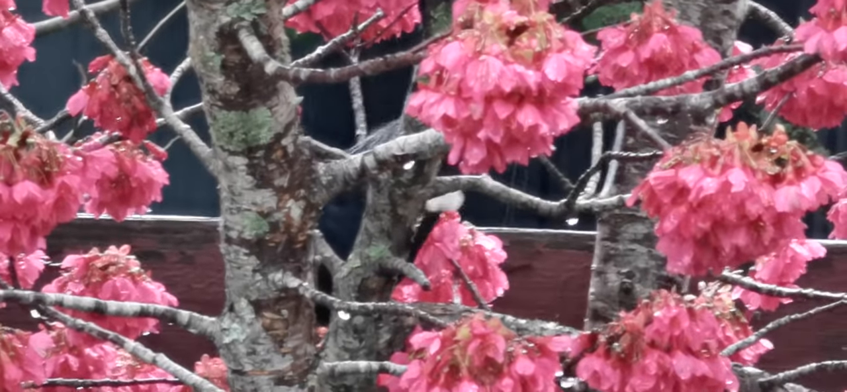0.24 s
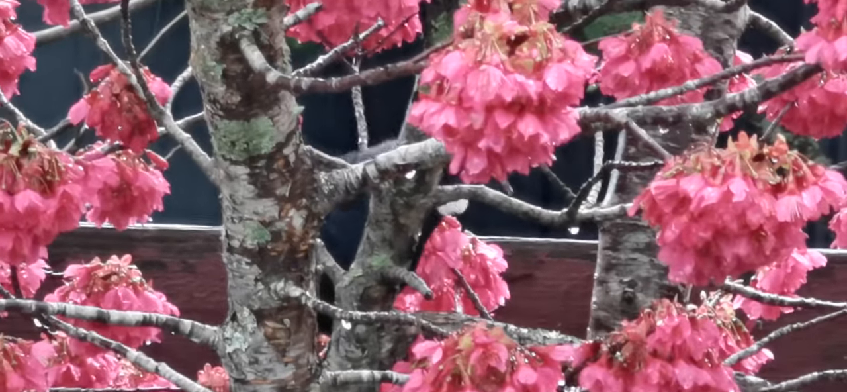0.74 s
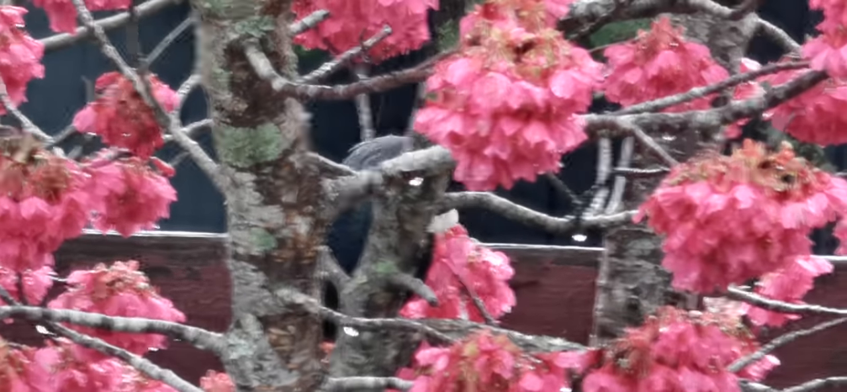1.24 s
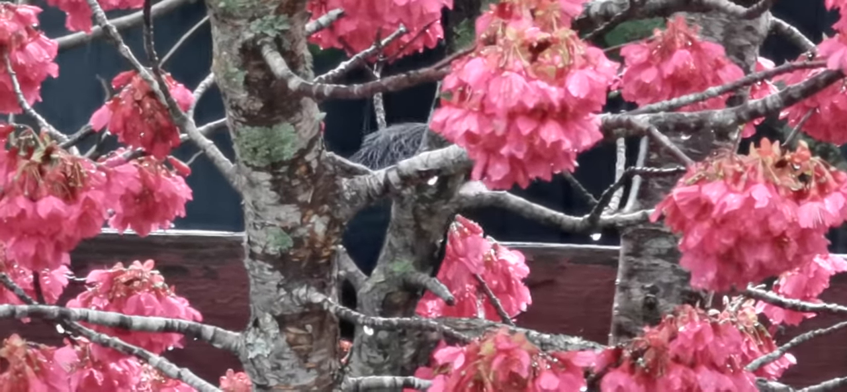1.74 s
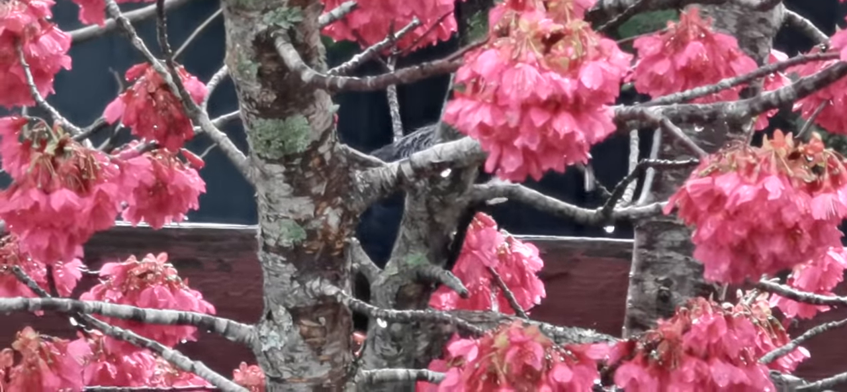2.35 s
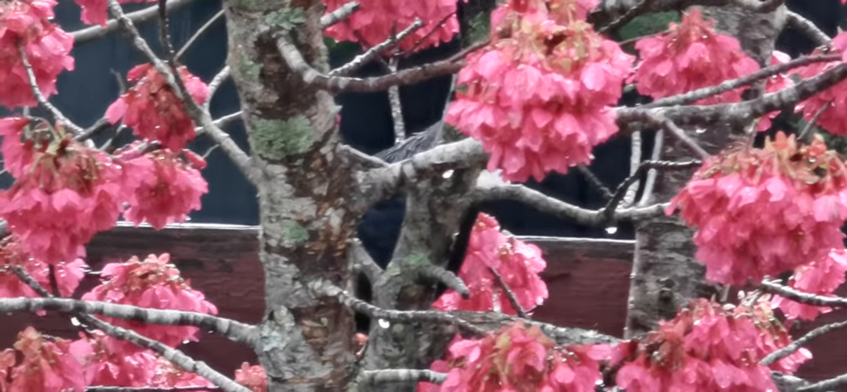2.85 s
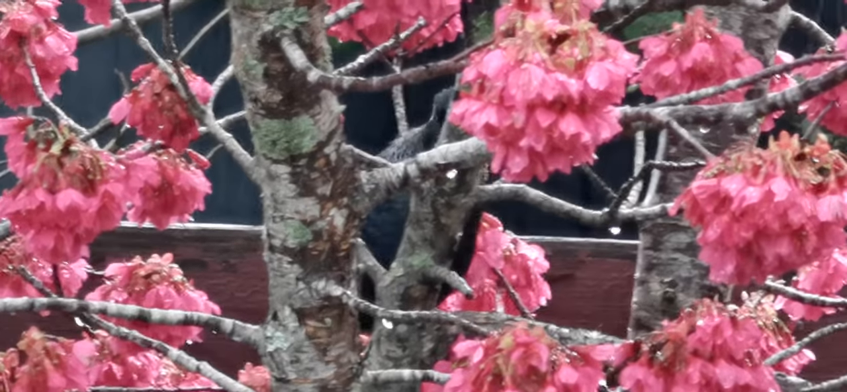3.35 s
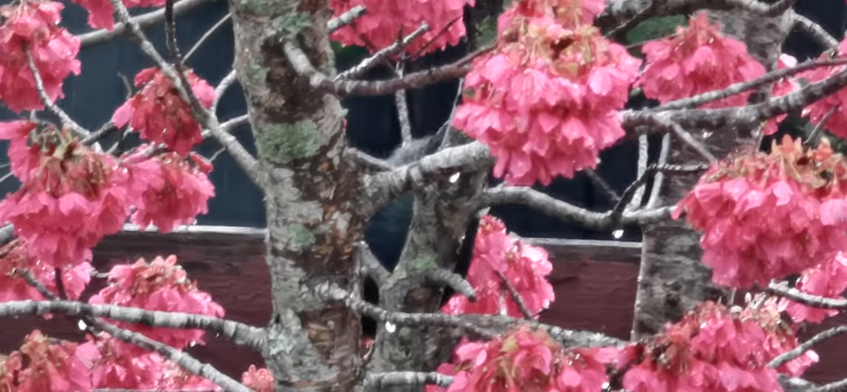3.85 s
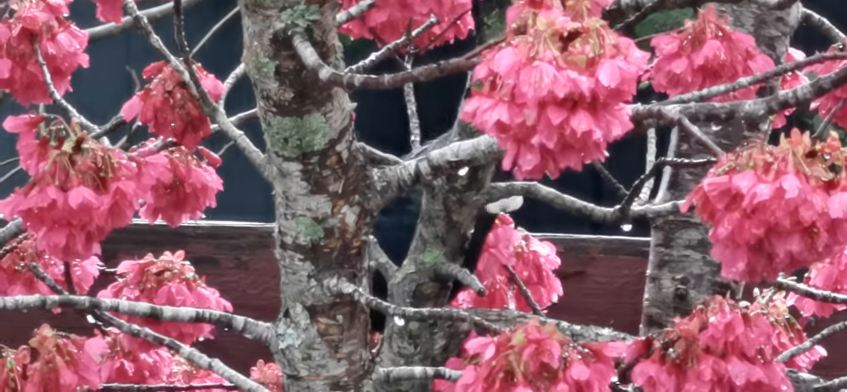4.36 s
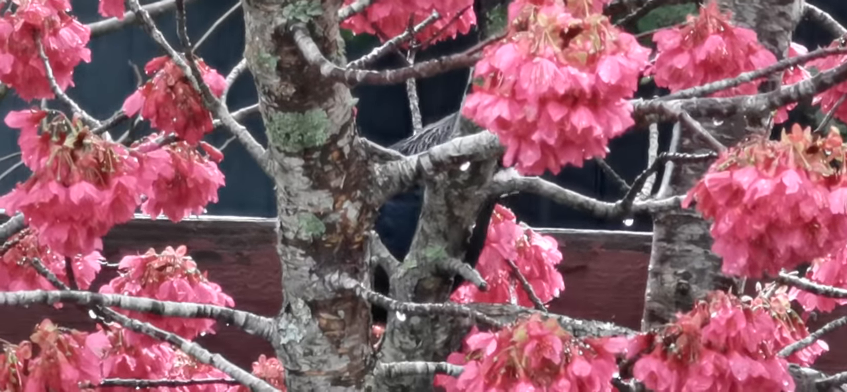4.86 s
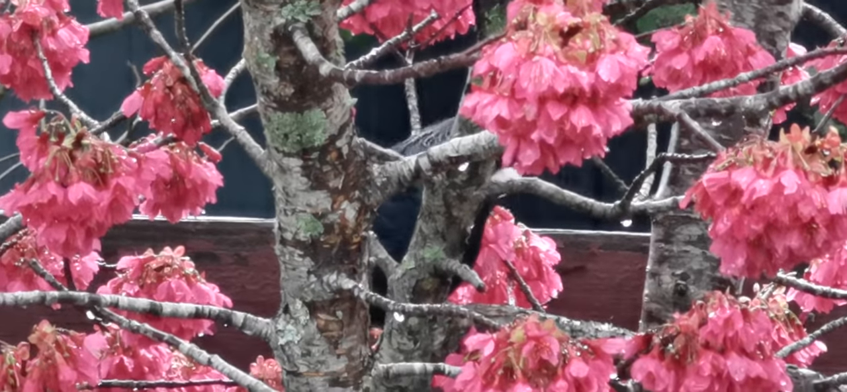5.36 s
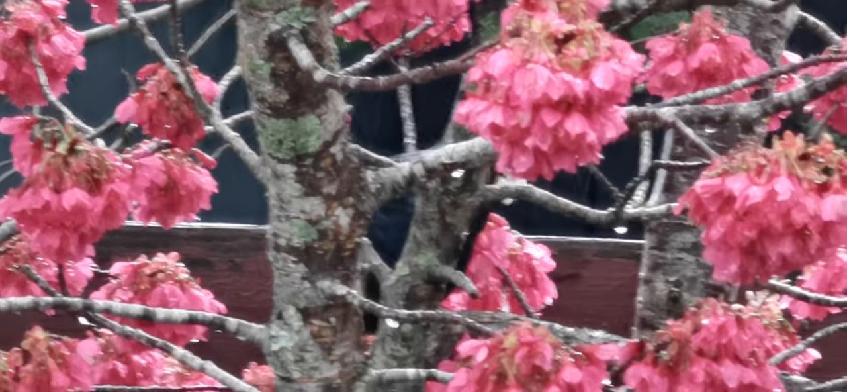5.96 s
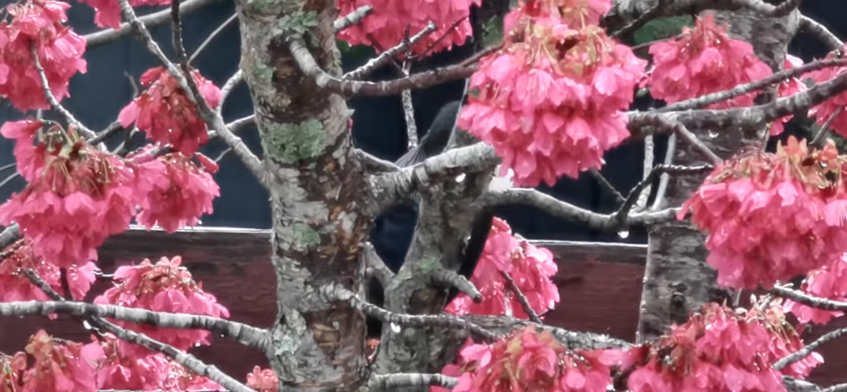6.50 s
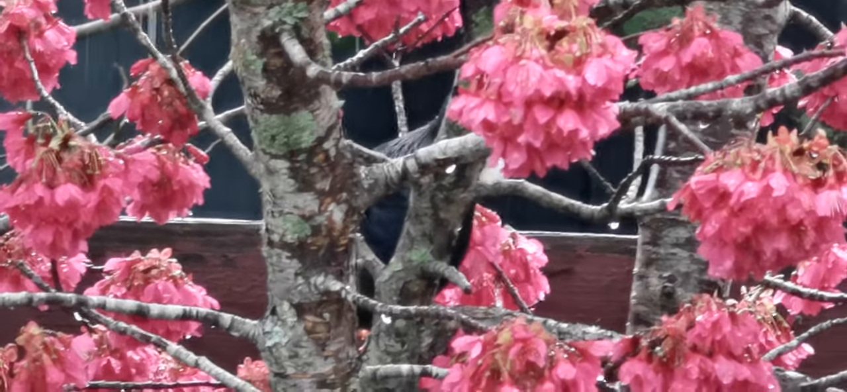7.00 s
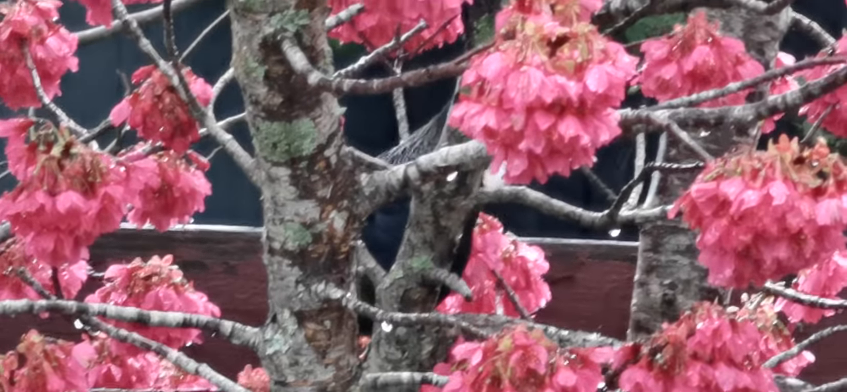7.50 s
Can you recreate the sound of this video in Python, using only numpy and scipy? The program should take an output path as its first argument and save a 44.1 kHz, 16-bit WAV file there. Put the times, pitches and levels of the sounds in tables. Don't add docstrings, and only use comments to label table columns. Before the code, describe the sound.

Outdoors by a blossom tree near a house wall, a faint low bed of distant traffic, air and machine hum runs throughout. At 0.1-0.6 s thin high whistles appear, one sharp peep at 0.27. A tiny fast trill of rising chirps comes at 0.8, then buzzy squeaks and short rasps around 1.1-1.3 and a high buzz with a wheeze at 1.8. Sliding whistles cluster at 2.1-2.5, a click at 2.6, bright buzz at 2.7, mellow notes at 3. A short harsh cough bursts at 3.6, low flute notes at 3.9-4.2, a slower high trill at 4.4, and a longer, rougher cough at 4.7-4.9. At 5.1-5.3 a loud croak rattles in about a dozen quick hollow pulses. Peeps at 5.45, a long wheeze with falling peeps from 5.7, then varied whistles, buzzes and puffs continue to 7.7. Close stereo, short leafy echoes.

```python
import sys
import numpy as np
from scipy import signal
from scipy.fft import rfft, irfft, next_fast_len
from scipy.io import wavfile
from scipy.ndimage import uniform_filter1d, minimum_filter1d, map_coordinates

SR = 44100
rng = np.random.default_rng(int(sys.argv[2]) if len(sys.argv) > 2 else 0)


def inscribe(sig):
    pcm = np.round(np.clip(np.atleast_2d(sig).T, -1, 1) * 32767)
    wavfile.write(sys.argv[1], SR, pcm.astype(np.int16))


def undo_db(level):
    steps = np.asarray(level, float) / 20
    return 10 ** steps


N = 341334

# (frequency [Hz], level [dB per Hz])
AIR_COLOUR = [(12, -27), (20, -4.5), (145, -2), (494, -17), (816, -12), (1170, -23), (1940, -18),
              (2940, -22), (4860, -19.5), (5740, -26.5), (6790, -25), (15700, -41)]
# (frequency [Hz], correlation [0-1])
AIR_LIKENESS = [(200, 0.92), (400, 0.78), (1000, 0.037), (3000, 0.029)]
# (frequency [Hz], level [dB])
MACHINE_HUM = [(40, -65), (80, -73.5), (119, -62.5), (159, -62.5), (200, -66.5)]

FAR_LEFT_DB, LEFT_DB, AHEAD_DB, RIGHT_DB, FAR_RIGHT_DB = 11, 2.5, -1, -6, -11.5
FLUTE_UNDER_HZ = 2400

# (time [s], length [s], pitch [Hz], level [dB])
HELD_LEFT = [
    (.01, 0.17, 6890, -59.5),
    (4.02, 0.072, 6830, -62),
    (4.165, 0.1, 534.5, -60),
    (5.62, 0.038, 4010, -57.5),
    (5.625, 0.019, 1332, -48),
    (7.48, 0.22, 1074, -58),
    (7.66, 0.066, 3400, -59.5),
    (.545, 0.039, 5670, -51),
]
HELD_AHEAD = [(.12, 0.15, 2294, -59), (.272, 0.036, 6366, -34), (.305, 0.067, 4926, -43.5),
              (1.36, 0.091, 4200, -47.5), (3.56, 0.063, 1913, -62), (4.08, 0.05, 527, -58.5),
              (5.455, 0.051, 6460, -37), (6.77, 0.038, 7990, -50.5), (6.96, 0.089, 4256, -55),
              (7.065, 0.033, 5200, -66), (7.3, 0.18, 1093, -57)]
HELD_RIGHT = [
    (4.1, 0.14, 1077, -44.5),
    (6.44, 0.068, 6710, -57),
    (7.25, 0.051, 10070, -52),
]
# (time [s], length [s], from [Hz], to [Hz], level [dB])
SLID_FAR_LEFT = [
    (3.483, .09, 5083, 3143, -53.5),
    (4.255, 0.043, 5420, 4510, -52.5),
]
SLID_LEFT = [(7.684, 0.03, 2164, 1560, -37.5), (.14, .03, 8590, 9000, -47),
             (3.075, 0.048, 1800, 2000, -53.5), (3.058, 0.014, 2470, 2333, -54),
             (0.96, 0.033, 2920, 2670, -65), (4.886, 0.03, 1450, 1000, -31),
             (5.455, 0.049, 3530, 3485, -59), (.245, 0.029, 5200, 6660, -52),
             (0.33, 0.043, 4640, 3140, -51), (0.37, 0.062, 3200, 2600, -61),
             (2.435, 0.035, 9200, 5900, -50.5), (2.98, 0.024, 1880, 1670, -45.5),
             (4.32, 0.055, 460, 455, -57.5), (6.12, 0.046, 5940, 5560, -53.5),
             (6.365, 0.059, 9700, 8900, -55.5), (6.718, 0.016, 3420, 3950, -55),
             (6.728, 0.033, 3990, 3760, -50.5)]
SLID_AHEAD = [(0.107, 0.05, 9980, 8380, -48.5), (0.476, 0.05, 9300, 6450, -44.5),
              (1.139, 0.009, 7950, 9300, -44.5), (1.24, 0.36, 8650, 7820, -60.5),
              (1.349, 0.14, 2577, 2664, -53.5), (1.37, 0.098, 1563, 1638, -54),
              (2.096, 0.02, 3420, 3950, -57), (2.108, 0.1, 3890, 3980, -50),
              (2.198, 0.019, 3980, 3540, -53), (2.093, 0.025, 4700, 6500, -58),
              (2.115, 0.083, 6580, 6580, -44), (2.2, 0.019, 6650, 5960, -51),
              (2.11, 0.088, 7200, 7270, -64), (2.145, 0.034, 5350, 4700, -59),
              (2.268, .055, 5000, 5400, -58.5), (2.301, 0.035, 5600, 5900, -61),
              (2.465, 0.059, 6040, 4440, -38.5), (2.527, 0.026, 4650, 3470, -46),
              (4.0, 0.098, 342, 388, -57), (5.894, 0.037, 5930, 5630, -49.5),
              (5.93, 0.059, 5630, 5960, -46), (5.95, 0.029, 4700, 3900, -65),
              (6.365, 0.13, 4160, 3900, -55), (6.37, 0.15, 8170, 7720, -54.5),
              (6.41, 0.109, 4520, 4230, -57.5), (6.4, 0.12, 9000, 8490, -46.5),
              (6.395, 0.052, 4700, 5340, -55.5), (6.668, 0.068, 1735, 2450, -56.5),
              (6.678, 0.033, 3580, 4620, -63), (6.678, 0.037, 6120, 5950, -60),
              (6.735, 0.028, 4700, 5360, -65), (6.777, 0.027, 4700, 5400, -54),
              (6.923, 0.016, 1010, 984, -46.5), (6.955, 0.054, 977, 927, -45),
              (2.403, 0.023, 7700, 8140, -53), (7.441, 0.031, 1720, 1110, -47.5),
              (7.44, 0.092, 3190, 2680, -57.5)]
SLID_RIGHT = [(2.725, .06, 2010, 2110, -54), (2.77, 0.068, 2107, 2070, -53), (2.84, .05, 2075, 2080, -63),
              (2.892, 0.026, 2040, 2160, -58), (2.72, 0.081, 4000, 4280, -65),
              (0.561, 0.034, 8140, 6680, -48), (1.785, 0.017, 7200, 9900, -45.5),
              (2.402, 0.012, 4900, 9600, -51.5), (2.419, 0.0075, 10000, 10050, -47),
              (3.05, 0.011, 5850, 2620, -51), (3.845, 0.022, 8540, 6820, -53),
              (3.861, 0.1, 1049, 1049, -38), (4.215, 0.0465, 1082, 1027, -39.5),
              (4.268, 0.018, 1050, 965, -54), (5.443, 0.067, 4860, 5170, -40.5),
              (5.95, 0.027, 1580, 1300, -53), (6.34, 0.04, 6430, 4700, -46.5),
              (6.39, .045, 5400, 6600, -52.5), (7.189, 0.044, 4140, 3040, -55)]
SLID_FAR_RIGHT = [
    (2.431, 0.078, 4740, 4700, -55),
    (3.99, 0.15, 5044, 4670, -57.5),
    (5.879, 0.023, 7010, 9970, -49),
    (6.23, 0.14, 2067, 2080, -42.5),
    (7.25, 0.056, 8500, 9340, -52),
]
# (time [s], length [s], from [Hz], to [Hz], level [dB])
REEDY_AHEAD = [
    (2.42, 0.0768, 1930, 1867, -62),
]
MELLOW_AHEAD = [
    (3.03, 0.031, 1986, 1773, -41.5),
]
MELLOW_FAR_LEFT = [
    (6.15, 0.051, 3583, 3570, -43.5),
]
REEDY_DB, MELLOW_DB = (-2, -2, -8), (0.5, -13.5, -9)
# (time [s], length [s], from [Hz], to [Hz], level [dB])
OCTAVE_AHEAD = [
    (.03, 0.13, 1737, 1720, -60),
    (7.115, 0.059, 2580, 2550, -63.5),
    (7.27, 0.058, 2514, 2530, -65.5),
]
OCTAVE_RIGHT = [
    (3.27, .16, 2325, 2105, -52),
    (3.28, 0.161, 1970, 2061, -53),
]
OCTAVE_AHEAD_DB, OCTAVE_RIGHT_DB = (1, 5.5), (0.5, -5)
# (time [s], length [s], from [Hz], to [Hz], level [dB])
COUGH_LINES = [(3.588, 0.026, 1950, 1887, -38), (3.602, 0.057, 1770, 1732, -34.5),
               (3.606, 0.056, 1336, 1370, -46), (3.64, 0.051, 2090, 2187, -43.5),
               (4.684, 0.076, 1686, 1656, -33), (4.69, .17, 1442, 1415, -39.5), (4.77, .1, 2260, 2205, -36),
               (4.76, .14, 2110, 2038, -35), (4.79, 0.12, 1662, 1585, -37.5),
               (4.862, 0.047, 1400, 1288, -37)]
# (time [s], length [s], from [Hz], to [Hz], level [dB])
FAINT_AHEAD = [(6.405, .12, 13500, 12700, -58.5), (6.43, 0.11, 12100, 11450, -60),
               (6.39, .04, 10800, 11300, -60), (.268, .045, 9520, 8600, -64),
               (.268, 0.043, 12700, 12700, -70), (0.081, .03, 11400, 11200, -58),
               (1.525, 0.0305, 5500, 5050, -58.5), (1.543, .05, 5050, 4900, -56.5),
               (1.607, .038, 3650, 4400, -56), (6.203, .018, 7500, 4600, -49.5),
               (7.295, .042, 770, 750, -54), (0.548, .045, 11400, 11200, -58.5)]
# (time [s], length [s], from [Hz], to [Hz], level [dB])
BUZZ_LEFT = [
    (1.966, 0.023, 9500, 8000, -45.5),
    (2.217, 0.013, 1695, 957, -39.5),
    (2.705, 0.024, 6210, 6340, -40),
    (2.712, 0.047, 5890, 6000, -48),
]
BUZZ_AHEAD = [(1.135, .045, 4900, 4440, -43.5), (1.234, 0.037, 4850, 4640, -45),
              (1.18, 0.021, 6550, 5440, -45), (1.277, 0.021, 6600, 5440, -45.5),
              (1.794, 0.09, 9700, 10280, -41.5), (1.88, 0.1, 10670, 9680, -44),
              (3.59, 0.057, 988, 868, -43.5), (3.855, 0.022, 10300, 9360, -53),
              (5.044, 0.082, 9530, 8240, -45.5), (5.965, 0.025, 2840, 2030, -46),
              (6.024, 0.048, 2787, 1826, -41.5), (6.036, 0.014, 2420, 2246, -40.5)]
BUZZ_RIGHT = [
    (.33, 0.022, 1060, 950, -54.5),
    (4.126, 0.023, 5680, 4180, -41.5),
    (4.686, 0.215, 2005, 1972, -37.5),
    (5.897, 0.081, 9780, 9140, -52),
]

# (frequency [Hz], level [dB per Hz])
BREATH_COLOUR = [(1000, -12.5), (3000, 0.5), (9000, 4.5), (13000, 2.5), (15800, -7)]
# (frequency [Hz], t60 [s])
ECHO_T60 = [(1500, 0.32), (6000, 0.3), (14000, 0.14)]

# (tempo [1/s], rows of (first [s], last [s], from [Hz], to [Hz], level [dB]))
TRILLS = [
    (47.6, [(.766, .766, 6850, 7300, -38.5), (.787, .808, 6950, 7300, -36), (.815, .836, 7200, 8030, -35.5), (.768, .768, 4900, 5200, -44), (.791, .835, 4780, 5300, -37)]),
    (20, [(4.355, 4.555, 4500, 5700, -52), (4.38, 4.58, 5000, 5900, -46), (4.336, 4.386, 7300, 10600, -52.5), (4.434, 4.586, 7900, 10000, -46.5)]),
]
# (tempo [1/s], rows of (first [s], last [s], from [Hz], to [Hz], level [dB]))
PEEPS = [
    (34.6, [(5.729, 5.789, 4100, 3950, -52), (5.819, 5.849, 3400, 3300, -57), (5.741, 5.861, 2500, 2100, -55.5)]),
    (19.9, [(4.362, 4.568, 6370, 6680, -50), (4.31, 4.31, 6400, 6760, -61), (4.338, 4.39, 10230, 10470, -52), (4.44, 4.59, 9700, 10040, -63), (6.79, 6.89, 2550, 1850, -52), (6.822, 6.872, 1900, 2420, -68)]),
]

# (time [s], length [s], centre [Hz], level [dB])
WHEEZE_LEFT = [
    (1.64, 0.045, 4180, -58),
    (2.235, 0.04, 5340, -57),
    (6.74, 0.21, 5020, -57),
]
WHEEZE_AHEAD = [(1.127, .015, 5900, -50), (1.14, 0.043, 12300, -53), (1.145, 0.054, 8750, -58),
                (1.785, 0.2, 5250, -55.5), (4.34, 0.044, 3880, -56.5), (5.727, 0.26, 6950, -53.5),
                (5.73, 0.24, 7750, -62), (6.375, 0.074, 5030, -54), (7.385, 0.096, 5020, -57.5),
                (7.57, 0.059, 7250, -56.5), (7.57, 0.059, 2030, -60)]
WHEEZE_RIGHT = [
    (1.225, 0.03, 6330, -55),
    (2.45, 0.072, 10600, -61),
    (5.128, 0.012, 5360, -44),
    (5.141, .012, 5100, -44),
    (6.828, 0.02, 8550, -49.5),
    (7.598, 0.034, 9500, -54.5),
]
# (time [s], length [s], centre [Hz], level [dB])
RASPS = [(.91, 0.07, 3700, -60.5), (1.24, 0.034, 9200, -56), (2.215, 0.011, 5530, -50.5),
         (2.615, 0.0066, 2270, -53.5), (5.246, 0.011, 2000, -41), (5.262, 0.022, 1500, -43.5),
         (1.14, 0.042, 4500, -55), (1.236, 0.041, 4360, -55), (5.74, 0.25, 4870, -55.5),
         (5.74, 0.29, 2240, -59.5), (5.99, 0.019, 4890, -47.5), (6.2, 0.045, 5320, -52.5),
         (6.873, 0.026, 8250, -48.5), (7.25, 0.08, 9500, -54), (7.277, 0.048, 1150, -55.5)]
# (time [s], length [s], centre [Hz], level [dB])
CLICKS = [
    (2.615, 0.0043, 5240, -47),
    (4.005, 0.0039, 9900, -54.5),
    (5.625, 0.0075, 5240, -54),
    (6.941, .005, 5500, -52.5),
]
WHEEZE_WIDTH, RASP_WIDTH, CLICK_WIDTH = 0.19, 0.47, 0.71

# (time [s], level [dB])
COUGHS = [
    [(3.59, -49.5), (3.644, -37), (3.76, -58)],
    [(4.681, -41.5), (4.695, -34.5), (4.8, -37.5), (4.9, -37)],
]
# (frequency [Hz], level [dB per Hz])
THROATS = [
    [(290, -34), (500, -19), (999, -11.5), (1520, -15), (1700, -17), (1990, -6), (2700, -16.5),
     (3200, -13.5), (4200, -19.5), (5000, -21), (5900, -15), (6900, -15.5), (9330, -25), (15700, -26)],
    [(530, -75), (900, -46), (1320, -19), (1420, -12), (1840, -9), (2080, -2.5), (2310, -14.5), (2580, -26),
     (3120, -13.5), (3600, -18), (4680, -14.5), (5300, -14), (5900, -16.5), (15700, -40.5)],
]
# (flap rate [Hz], rows of (time [s], length [s], from [Hz], to [Hz], level [dB]))
CHOPPED = [
    (171.5, [(3.59, 0.056, 1945, 1890, -35), (3.59, 0.096, 4950, 5010, -46), (3.625, 0.064, 2154, 2213, -43.5)]),
    (97.6, [(4.75, 0.156, 2176, 2120, -35.5), (4.70, .21, 4780, 4600, -39), (4.705, 0.135, 3150, 3050, -50), (4.69, 0.14, 5850, 5500, -44)]),
]

# (time [s], burst peak [dB], air sac ring [dB])
CROAK = [(5.114, -56, -36), (5.127, -58, -30.5), (5.141, -44, -30), (5.155, -30, -26), (5.171, -27.5, -27),
         (5.185, -28, -25.5), (5.201, -27, -27), (5.216, -27, -24), (5.232, -27.5, -30),
         (5.247, -29, -23.5), (5.262, -29, -34), (5.277, -51, -39)]
# (frequency [Hz], level [dB], t60 [s])
AIR_SAC = [(775, 4.5, 0.023), (1540, -12, 0.033)]
# (frequency [Hz], level [dB], t60 [s])
BEAK = [(3900, -20, 0.039), (4650, -3.5, .03), (5250, -4.5, .03), (6620, -6, 0.034), (7100, -10.5, 0.033)]
# (frequency [Hz], level [dB per Hz])
SPIT_COLOUR = [(600, -30), (1550, -12), (2000, -12), (2900, -20), (3900, 2), (4700, 2.5), (5800, 3),
               (7000, -2), (15700, -15.5)]
WINDPIPE_HZ, WINDPIPE_DB, WINDPIPE_T60 = 2356, -9, 0.1
SPIT_DB = -4

# (frequency [Hz], left minus right [dB])
PORT_TILT = [(60, 3.5), (700, -3), (2300, -5.5), (4400, 1), (8000, -4.5), (15000, -14)]


def unit(x):
    return x / np.sqrt(np.mean(x ** 2) + 1e-20)


def along(points, hz):
    f, v = np.transpose(points)
    return np.interp(np.log(hz + 1), np.log(f + 1), v)


def wobble(rate, size):
    knots = rng.standard_normal(int(size * rate / SR) + 4)
    return map_coordinates(knots, [np.arange(size) * rate / SR])


def noise(size, gain):
    m = next_fast_len(size + 2048)
    spectrum = rfft(rng.standard_normal(m)) * gain(np.fft.rfftfreq(m, 1 / SR))
    return unit(irfft(spectrum, m)[:size])


def swell(size, rise, fall):
    u = np.arange(size) / size
    ramp = np.minimum(u / rise, (1 - u) / fall)
    return np.sin(np.pi / 2 * np.clip(ramp, 0, 1))


def glide(length, from_hz, to_hz, bend=1, waver=0, buzz=0):
    size = int(length * SR) + 8
    hz = from_hz + (to_hz - from_hz) * (np.arange(size) / size) ** bend
    hz = hz * (1 + waver * wobble(48.3, size) + buzz * wobble(498.2, size))
    return np.sqrt(2) * np.sin(2 * np.pi * (np.cumsum(hz) / SR + rng.random()))


def add(tree, s, sound, db, pan_db):
    lag = np.clip((1 - pan_db) * 2e-4, -4e-4, 4.4e-4)
    gains = np.sqrt(2 / (1 + undo_db(-2 * np.array([pan_db, -pan_db]))))
    for port, delay, gain in zip(tree, (lag / 2, -lag / 2), gains):
        part = port[max(round((s + delay) * SR), 0):][:len(sound)]
        part += undo_db(db) * gain * sound[:len(part)]


def patches(x, depth_db):
    hz, _, z = signal.stft(x, SR, nperseg=512)
    field = uniform_filter1d(rng.standard_normal(z.shape[1:]), size=9, axis=0)
    field = unit(uniform_filter1d(field, size=16, axis=1))
    gain = undo_db(depth_db * field * (hz > 900)[:, None])
    return signal.istft(z * gain, SR, nperseg=512)[1][:, :N]


def background():
    hz = np.fft.rfftfreq(N, 1 / SR)
    turn = np.arccos(np.clip(along(AIR_LIKENESS, hz), -1, 1)) / 2
    white = noise(2 * N, lambda hz: 1 + 0 * hz).reshape(2, N)
    mid, side = irfft(rfft(white) * undo_db(along(AIR_COLOUR, hz)) * [np.cos(turn), np.sin(turn)], N)
    air = unit(patches(np.array([mid + side, mid - side]), depth_db=3.5))
    air = undo_db(-55 + 0.039 * wobble(2.1, N)) * air
    t = np.arange(N) / SR
    hum = 0
    for line_hz, db in MACHINE_HUM:
        phase = 2 * np.pi * line_hz * t + 1.9 * wobble(4.3, N)
        hum = hum + undo_db(db + 4.54 * wobble(5, N)) * np.sin(phase)
    return air + hum


def placed(*perches):
    return [(*row, pan_db) for rows, pan_db in perches for row in rows]


def held(rows):
    return [(s, length, hz, hz, db) for s, length, hz, db in rows]


def partials(rows, partial_db):
    return [(s, length, k * from_hz, k * to_hz, db + rel)
            for s, length, from_hz, to_hz, db in rows for k, rel in enumerate(partial_db, 1)]


def clear_notes():
    far_left = SLID_FAR_LEFT + partials(MELLOW_FAR_LEFT, MELLOW_DB)
    left = held(HELD_LEFT) + SLID_LEFT
    ahead = COUGH_LINES + FAINT_AHEAD + held(HELD_AHEAD) + SLID_AHEAD
    ahead = ahead + partials(REEDY_AHEAD, REEDY_DB) + partials(MELLOW_AHEAD, MELLOW_DB)
    ahead = ahead + partials(OCTAVE_AHEAD, OCTAVE_AHEAD_DB)
    right = held(HELD_RIGHT) + SLID_RIGHT + partials(OCTAVE_RIGHT, OCTAVE_RIGHT_DB)
    return placed((far_left, FAR_LEFT_DB), (left, LEFT_DB), (ahead, AHEAD_DB), (right, RIGHT_DB),
                  (SLID_FAR_RIGHT, FAR_RIGHT_DB))


def whistles(rows, buzz, flutter_db, rise, fall=0.21):
    groups = np.zeros((2, 2, N))
    for k, (s, length, from_hz, to_hz, db, pan_db) in enumerate(rows):
        note = glide(length, from_hz, to_hz, bend=.8, waver=0.0028, buzz=buzz)
        flutter = undo_db(flutter_db * wobble(69.0, len(note)))
        add(groups[k % 2], s, note * flutter * swell(len(note), rise, fall), db, pan_db)
    return groups


def breath(song):
    high = signal.lfilter([1, -2, 1], 1, song)
    strength = np.sqrt(abs(uniform_filter1d(high ** 2, size=500, axis=1)))
    return undo_db(-18.5) * strength * noise(N, lambda hz: undo_db(along(BREATH_COLOUR, hz)))


def echoes(x):
    hz, _, z = (spread := signal.stft(rng.standard_normal((2, SR // 3)), SR, nperseg=256))
    t = spread[1]
    decay = undo_db(-60 * t / along(ECHO_T60, hz)[:, None])
    tail = signal.istft(z * decay, SR, nperseg=256)[1]
    blend = x + 0.0089 * x[::-1]
    late = np.pad(blend, ((0, 0), (200, 0)))
    return signal.oaconvolve(late, tail / np.linalg.norm(tail[0]), axes=1)[:, :N]


def beats(first, last, rate):
    count = round((last - first) * rate) + 1
    return np.linspace(first, last, count) + .0007 * rng.standard_normal(count)


def trills():
    tree = np.zeros((2, N))
    for rate, rows in TRILLS:
        for first, last, from_hz, to_hz, db in rows:
            for s in beats(first, last, rate):
                shift, strength = rng.standard_normal(2)
                chirp = glide(0.0114, from_hz, to_hz * (1 + 0.019 * shift), bend=0.615, buzz=0.024)
                chirp = chirp * swell(len(chirp), 0.071, 0.11)
                add(tree, s, chirp, db + 0.53 * strength, pan_db=-1.5)
    for rate, rows in PEEPS:
        for first, last, from_hz, to_hz, db in rows:
            for s in beats(first, last, rate):
                peep = glide(0.497 / rate, from_hz, to_hz, bend=0.506, buzz=0.013)
                peep = peep + undo_db(-15) * (peep ** 2 - 1)
                peep = peep * swell(len(peep), 0.31, 0.24)
                add(tree, s, peep, db + 2 * rng.standard_normal(), pan_db=-4)
    return tree


def wheezes():
    narrow = placed((WHEEZE_LEFT, LEFT_DB), (WHEEZE_AHEAD, AHEAD_DB), (WHEEZE_RIGHT, RIGHT_DB))
    broad, clicks = placed((RASPS, AHEAD_DB)), placed((CLICKS, AHEAD_DB))
    tree = np.zeros((2, N))
    for rows, width in (narrow, WHEEZE_WIDTH), (broad, RASP_WIDTH), (clicks, CLICK_WIDTH):
        for s, length, centre_hz, db, pan_db in rows:
            size = int(length * SR) + 8
            width_hz = width * centre_hz
            rasp = noise(size, lambda hz: 1 / (1 + abs(2 * (hz - centre_hz) / width_hz) ** 2.12))
            puffs = undo_db(3.05 * wobble(72.4, size))
            add(tree, s, rasp * puffs * swell(size, 0.033, 0.46), db, pan_db)
    return tree


def coughs():
    tree = np.zeros((2, N))
    for rows, throat in zip(COUGHS, THROATS):
        s, db = np.transpose(rows)
        size = int((s[-1] - s[0]) * SR)
        clumps = undo_db(0.67 * wobble(140, size))
        rasp = unit(noise(size, lambda hz: undo_db(along(throat, hz))) * clumps)
        effort = undo_db(np.interp(s[0] + np.arange(size) / SR, s, db))
        add(tree, s[0], rasp * effort * swell(size, 0.0024, 0.098), 0, pan_db=-3)
    return tree


def chopped():
    tree = np.zeros((2, N))
    for rate, rows in CHOPPED:
        for s, length, from_hz, to_hz, db in rows:
            note = glide(length, from_hz, to_hz, waver=0.0062, buzz=0.0291)
            size = len(note)
            flap = np.cos(2 * np.pi * np.cumsum(rate * (1 + 0.13 * wobble(70, size))) / SR)
            pulses = undo_db(5.0 * flap + 1.9 * wobble(87, size))
            add(tree, s, note * unit(pulses) * swell(size, 0.061, 0.28), db, pan_db=-2)
    return tree


def croak():
    bursts, sac = np.zeros((2, N)), np.zeros((2, N))
    t = np.arange(SR // 30) / SR
    ring = sum(undo_db(db - 60 * t / t60) * np.sin(2 * np.pi * hz * t) for hz, db, t60 in AIR_SAC)
    ring = ring * (1 - np.exp(-t / 0.0035))
    pipe = undo_db(WINDPIPE_DB - 60 * t / WINDPIPE_T60) * np.sin(2 * np.pi * WINDPIPE_HZ * t)
    pipe = pipe[:SR // 70]
    pipe = pipe * swell(len(pipe), 0.16, 0.15)
    for s, burst_db, sac_db in CROAK:
        spit = undo_db(SPIT_DB - 60 * t / 0.046) * noise(len(t), lambda hz: undo_db(along(SPIT_COLOUR, hz)))
        beak = 0
        for hz, db, t60 in BEAK:
            strength = undo_db(db + 2.5 * rng.standard_normal() - 60 * t / t60)
            pitch = hz * (1 + 0.017 * rng.standard_normal())
            beak = beak + strength * np.sin(2 * np.pi * pitch * t)
        add(bursts, s, spit + beak * (1 - np.exp(-t / 0.001)), burst_db, pan_db=-1)
        add(sac, s, ring, sac_db, pan_db=1.0)
        add(sac, s, pipe, burst_db, pan_db=0.5)
    return bursts, sac


def scene():
    notes = clear_notes()
    high = [n for n in notes if n[2] >= FLUTE_UNDER_HZ]
    low = [n for n in notes if n[2] < FLUTE_UNDER_HZ]
    buzzy = placed((BUZZ_LEFT, LEFT_DB), (BUZZ_AHEAD, AHEAD_DB), (BUZZ_RIGHT, RIGHT_DB))
    clear = whistles(high, buzz=0.0077, flutter_db=2.0, rise=0.2)
    flutes = whistles(low, buzz=0.0031, flutter_db=1.26, rise=0.19, fall=0.091).sum(0)
    rough = whistles(buzzy, buzz=0.0273, flutter_db=1.5, rise=0.18)
    chirps, wheezing = trills(), wheezes()
    song = clear.sum(0) + rough.sum(0) + wheezing + chirps
    airy = patches(wheezing + breath(song), depth_db=2.5)
    harsh = patches(coughs(), depth_db=3.5) + chopped()
    bursts, sac = croak()
    voices = [(clear[0], -3), (clear[1], -3), (rough[0], -3), (rough[1], -4), (airy, -0.5), (chirps, -0.5),
              (harsh, -1), (sac + flutes, -8), (bursts, -1.5)]
    return background() + sum(voice + undo_db(echo_db) * echoes(voice) for voice, echo_db in voices)


def starve(x, under_db):
    z = signal.stft(x, nperseg=1024)[2]
    bands = abs(z[:, 110:380].reshape(2, 27, 10, -1)) ** 2
    peak = bands.max(axis=2, keepdims=True)
    nearby_peak = -minimum_filter1d(-peak, size=9, axis=1, origin=3)
    luck = undo_db(18 * uniform_filter1d(rng.standard_normal(nearby_peak.shape), size=5, axis=3))
    share = uniform_filter1d(bands.mean(axis=2, keepdims=True) / nearby_peak, size=3, axis=3)
    gain = np.where(share * luck < undo_db(-2 * under_db), undo_db(-45), 1)
    z[:, 110:380] *= np.repeat(gain, 10, axis=2).reshape(2, 270, -1)
    return signal.istft(z, nperseg=1024)[1][:, :N]


def low_pass(x):
    return signal.sosfilt(signal.butter(12, 15820, fs=SR, output="sos"), x)


def record(dry):
    tilt_db = along(PORT_TILT, np.fft.rfftfreq(N, 1 / SR)) / 2
    heard = irfft(rfft(dry) * undo_db([tilt_db, -tilt_db]), N)
    heard = signal.sosfilt(signal.ellip(12, .3, 70, 15800, fs=SR, output='sos'), heard)
    mix = starve(heard, under_db=30.5)
    return low_pass(mix)


dry = scene()
out = record(dry)
inscribe(out)
```